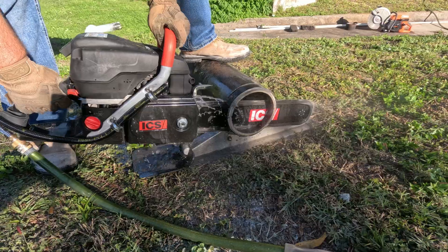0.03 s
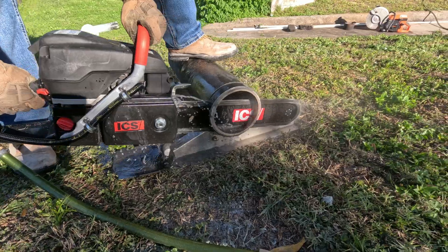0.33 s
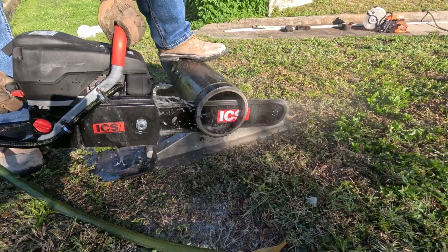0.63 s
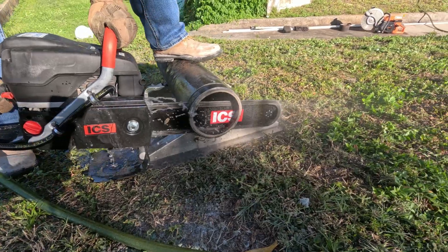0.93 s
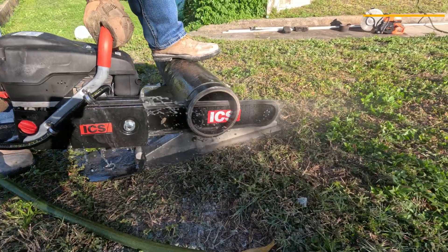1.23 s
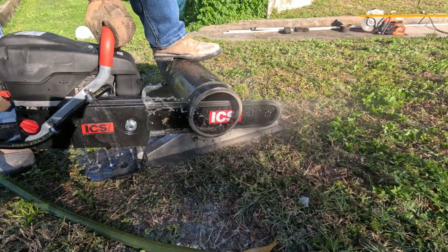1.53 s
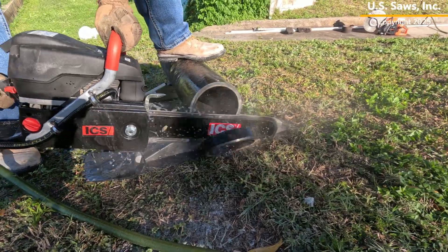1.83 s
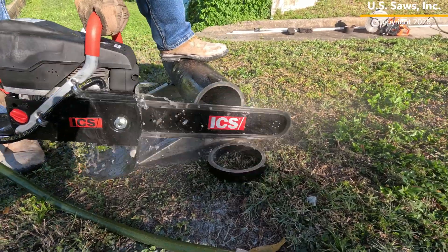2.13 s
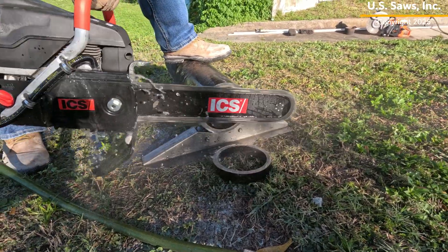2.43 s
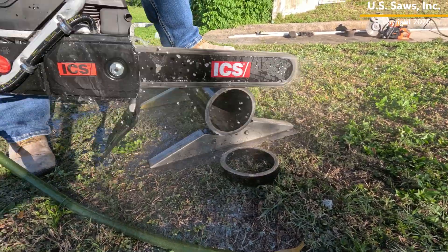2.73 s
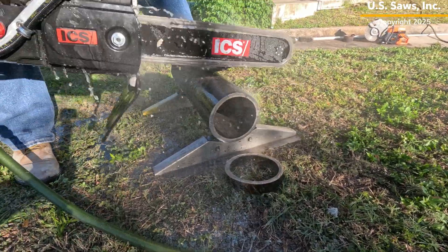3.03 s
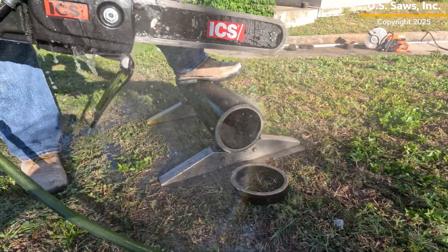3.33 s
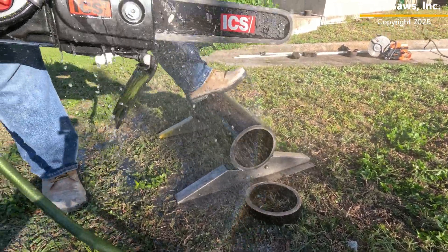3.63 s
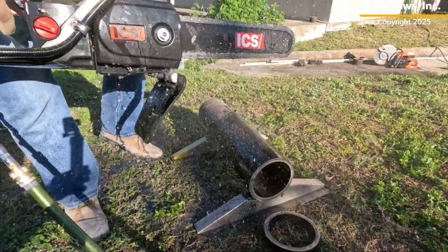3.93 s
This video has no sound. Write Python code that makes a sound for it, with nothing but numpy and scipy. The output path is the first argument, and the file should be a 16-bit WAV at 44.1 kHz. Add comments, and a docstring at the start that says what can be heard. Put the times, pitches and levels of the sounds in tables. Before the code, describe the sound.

A two-stroke chainsaw labours through a metal pipe, close by on a lawn. It gains speed, races and stutters as the cut ends, is revved twice, then coasts towards idle with its chain rattling and whining.

```python
"""A two-stroke chainsaw labours through a metal pipe, close by on a lawn. It gains speed as the cut
opens, races and stutters when the ring drops off, is blipped twice and coasts towards idle.
Each firing is a thump of gas, a crack through the muffler and a jet of hiss; with the throttle shut
the piston pumps soft puffs of air. The wet chain rattles round its ringing bar and whines on its
sprocket, over a low rumble of air."""
import sys
import numpy as np
from scipy import signal
from scipy.io import wavfile
from scipy.ndimage import uniform_filter1d

SR = 44100
rng = np.random.default_rng(int(sys.argv[2]) if len(sys.argv) > 2 else 0)


def master_out(mix):
    """Clip the mix to full scale and print it as 16-bit PCM to the path in sys.argv[1]."""
    frames = np.transpose(np.atleast_2d(mix))
    ceiling = np.clip(frames, -1, 1)
    pcm = np.round(ceiling * 32767).astype(np.int16)
    wavfile.write(sys.argv[1], SR, pcm)


N = 176400
T = np.arange(N) / SR
CRUISE_HZ = 124  # reference engine speed


# Revs of the engine: time_s, speed_hz
ENGINE_SPEED = [(0.0, 92.61), (0.25, 91.95), (0.45, 92.2), (0.58, 95.63), (0.7, 103.27), (0.82, 111.55),
                (0.97, 116.13), (1.2, 121.74), (1.55, 123.49), (1.75, 125.3), (1.85, 128.91),
                (1.97, 152.78), (2.06, 156.16), (2.17, 132.96), (2.3, 107.63), (2.45, 89.09), (2.6, 71.33),
                (2.72, 104.52), (2.81, 90.51), (2.91, 114.36), (2.98, 125.43), (3.065, 140.79),
                (3.18, 119.74), (3.32, 95.28), (3.5, 72.92), (3.65, 59.7), (3.8, 52.8), (4.0, 46.94)]
def crankshaft():
    """The engine's speed and its running count of turns, which drive the saw."""
    speed = curve(ENGINE_SPEED)
    return speed, .17 + np.cumsum(speed) / SR


# The long cut and two blips: start_s, end_s, gas_flow_db, load_fraction
THROTTLE_OPEN = [(0, 2.0, 2, 0.84), (2.601, 2.726, -0.5, 0.11), (2.815, 3.068, 1.5, 0.03)]
def throttle(ramp_s=.016):
    """Gates for throttle shut, gas flow, firing under load and revving free."""
    gates = np.zeros((4, N))
    for start, end, flow_db, load in THROTTLE_OPEN:
        gate = np.clip(np.minimum(T - start, end - T) / ramp_s + .5, 0, 1)
        gates += np.outer([1, amp(flow_db), load, 1 - load], gate)
    opened, flow, loaded, free = gates
    return 1 - opened, flow, loaded, free


# Low body of the exhaust: harmonic, level_db
THUMP_HARMONICS = [(1, 0.5), (2, -8.5), (3, -17.5)]
def exhaust_thump(turns, flow):
    """A smooth swell of gas follows each opening of the exhaust port."""
    return amp(-22.5) * harmonics(turns, THUMP_HARMONICS) * flow


# Bite of the exhaust crack: time_s, level_db
CRACK_LEVEL = [(0, 0), (.55, 0), (.9, 2), (1.3, 1), (1.8, 1.5), (2.0, 2), (2.6, 6), (2.72, 5), (2.82, 6),
               (2.91, 7), (2.945, 1), (2.99, 7), (3.07, 9)]
# Bright muffler tone under load: freq_hz, gain_db
LOADED_EQ = [(200, -25), (380, -16), (490, -18.5), (620, 0), (780, -1), (980, 7.5), (1120, 1.5),
             (1260, -13.5), (1480, -2.5), (1700, -10.5), (2050, -2.5), (2550, -14.5), (3200, -9),
             (4000, -10.5), (5200, -22.5), (12000, -52)]
# Darker muffler tone when revving free: freq_hz, gain_db
FREE_EQ = [(200, -11.5), (380, -7.5), (520, -4.5), (680, 3.5), (850, 0.5), (1050, -4), (1300, -16.5),
           (1650, -14.5), (2050, -12.5), (2600, -20), (4000, -38.5), (12000, -85)]
def exhaust_crack(turns, loaded, free):
    """On open throttle, one firing a turn cracks through the muffler."""
    pulses = beats(turns, spread_db=1.2, jitter_s=.00002) * amp(curve(CRACK_LEVEL))
    return amp(-31.5) * evened(colour(pulses * free, FREE_EQ) - colour(pulses * loaded, LOADED_EQ))


# Tone of the gas hiss: freq_hz, gain_db
JET_EQ = [(150, -11), (500, -10), (1100, 4), (1400, -1.5), (2000, 1.5), (2500, -3.5), (3300, 2), (4100, 3),
          (5200, -4.5), (7600, -3), (8800, -10.5), (11000, -19.5), (15000, -32)]
def gas_jet(turns, flow, decay_turns=.32):
    """Escaping gas and biting teeth give a burst of hiss on each firing."""
    burst = (.16 + np.exp(-(turns % 1) / decay_turns)) * flow
    mid, side = (evened(colour(burst * noise, JET_EQ)) for noise in rng.standard_normal((2, N)))
    return amp(-34) * place(mid, .29 * side, left_db=.54)


# Lone firings off the throttle: start_s, level_db, sharpness_fraction
STRAY_FIRINGS = [(2.0045, 5.5, 0.56), (2.030, 4, 0.76), (2.056, 3.5, 0.74), (2.082, 3, 0.65),
                 (2.338, 0, 0.1), (2.446, -7, 0.3), (2.567, -2.5, 0.1), (3.813, -24, 0.3), (3.9, -9, 0.2),
                 (3.977, -10, 0.1)]
# Tone of a sharp misfire: freq_hz, gain_db
MISFIRE_EQ = [(200, -6), (600, -9), (950, -5), (1250, -9.5), (1580, 3), (1850, -3), (2300, -13),
              (3300, -10), (5000, -20), (12000, -40)]
def pops(push_s=.0012):
    """Each stray firing is a crack, part dull and part sharp, with one push of gas."""
    times, db, sharpness = np.transpose(STRAY_FIRINGS)
    hits = clicks(times, amp(db))
    sharp = clicks(times, amp(db) * sharpness)
    crack = colour(hits - sharp, FREE_EQ) - colour(sharp, MISFIRE_EQ)
    age = T[:SR // 20] / push_s
    push = signal.oaconvolve(hits, age * (2 - age) * np.exp(-age))[:N]
    return amp(8) * crack + amp(-16.5) * push


def muffler_drone(speed, turns, loaded, db_per_octave=-38):
    """The muffler body drones while the engine labours at low speed."""
    labour = loaded * amp(db_per_octave * np.log2(speed / CRUISE_HZ))
    pulses = beats(turns, spread_db=1.2, jitter_s=.00002) * labour
    return amp(-43.5) * evened(formant(pulses, hz=414, width_hz=120))


# Hum of the coasting engine: harmonic, level_db
HUM_HARMONICS = [(1, 1.5), (2, -14.5), (3, -20.5)]
# Fader on the unfired puffs: time_s, level_db
PUFF_FADER = [(2.1, -26), (2.3, -14), (2.5, 0), (2.78, 1), (3.1, -2.5), (3.4, 0.5), (4, 2)]
def coasting(speed, turns, shut):
    """Unfired, the piston pumps air: a hum, low gulps, and puffs whose pitch sinks with the revs."""
    octaves = np.log2(speed / CRUISE_HZ)
    hum = amp(-31 + 15.5 * octaves) * harmonics(turns, HUM_HARMONICS)
    strokes = evened(beats(turns, spread_db=1, jitter_s=.00008))
    air = evened(np.exp(-(turns % 1) / 1.05) * rng.standard_normal(N))
    drive = strokes + .44 * air
    slow_boost = amp(-5 * octaves)
    puffs = evened(slow_boost * formant(drive, hz=298 + 3.37 * speed, width_hz=217))
    gulps = evened(slow_boost ** 2 * formant(drive, hz=155.4, width_hz=66))
    return shut * (hum + amp(-42 + curve(PUFF_FADER)) * puffs + amp(-47) * gulps)


# Tone of the chain rattle: freq_hz, gain_db
RATTLE_EQ = [(150, -19), (330, -12.5), (600, -0.5), (900, -6), (1200, -4), (1350, -7.5), (1550, -2.5),
             (1950, -5.5), (2450, -8.5), (3000, -3), (3550, -8), (4000, -7), (5300, -10.5), (6400, -6),
             (7800, -6), (8500, -14.5), (10500, -22.5), (12500, -33), (15500, -47)]
# Metallic ring of the guide bar: pitch_hz, width_hz, level_db
BAR_MODES = [(1730, 110, -18.5), (1890, 54, -12), (3120, 74, 0), (3190, 33, 6.5), (6220, 97, -15),
             (6900, 90, -10), (7380, 190, -7.5)]
# Chain faders, the bar damped during the cut: time_s, rattle_db, ring_db, sing_db
CHAIN_FADERS = [(0, 4, -9, -17), (1.0, 3.5, -13, -12), (1.8, 3.5, -5, -8), (2.08, -0.5, -7, -17),
                (2.17, 1.5, -2.5, -8), (2.57, -0.5, -2.5, -4), (2.9, 2.5, -3, -5), (3.15, 2.5, -5, -2),
                (3.55, 0, -7, 3.5), (3.85, -0.5, -4, 1), (4, -2.5, -5, -9)]
def chain(speed, turns, links_per_turn=24):
    """Links slap at scattered points of each turn and ring the bar, in a hiss of flung water."""
    slaps = sum(beats(turns + offset, spread_db=2, jitter_s=.00006) * np.sign(polarity - .5)
                for offset, polarity in rng.random((links_per_turn, 2)))
    flutter = amp(.98 * waver(samples=600))
    spray = .97 * rng.standard_normal(N)
    drive = (evened(slaps) + spray) * flutter
    rattle = evened(colour(drive, RATTLE_EQ))
    ring = evened(sum(amp(db) * resonate(drive, hz, width) for hz, width, db in BAR_MODES))
    sing = evened(formant(drive, hz=2754 + 1.8 * speed, width_hz=180))  # one bar mode follows the revs
    return (amp(-34.5 + curve(CHAIN_FADERS, column=1)) * rattle
            + amp(-39.5 + curve(CHAIN_FADERS, column=2)) * ring
            + amp(-44 + curve(CHAIN_FADERS, column=3)) * sing)


# Partials of the sprocket: engine_harmonic, level_db
WHINE_PARTIALS = [(6, -1.5), (8, 6), (12, -12), (13, -7)]
def sprocket_whine(speed, turns, shut, waver_db=4):
    """Off the throttle, the slack chain whines on its sprocket, sinking and fading with the revs."""
    tone = np.zeros(N)
    for harmonic, db in WHINE_PARTIALS:
        level = amp(db + waver_db * waver(samples=1500))
        tone += level * np.cos(2 * np.pi * (harmonic * turns + rng.random()))
    return amp(-47.5) * evened(tone) * shut * speed / CRUISE_HZ


def yard_echo(x, t60_s=.12):
    """The surroundings scatter back a faint, short tail of mids and treble."""
    t = T[:SR // 4]
    tail = rng.standard_normal((2, len(t))) * amp(-60 * t / t60_s) * (t > .004)
    tail = signal.sosfilt(signal.butter(2, 400, "high", fs=SR, output="sos"), tail)
    return amp(-19) * signal.oaconvolve(x, tail / np.linalg.norm(tail[0]), axes=1)[:, :N]


# Tone of the low air bed: freq_hz, gain_db
AIR_EQ = [(15, -8), (40, -4), (120, -0.5), (250, -12), (600, -13.5), (2000, -55)]
def air_rumble():
    """Air stirs softly round the microphone."""
    mid, side = (evened(colour(noise, AIR_EQ)) for noise in rng.standard_normal((2, N)))
    return amp(-41.5) * place(mid, .37 * side, left_db=0)


def amp(db):
    """Decibels to gain."""
    return 10 ** (np.asarray(db) / 20)


def evened(x):
    """Scales to an rms of 1."""
    return x / np.sqrt(np.mean(x ** 2) + 1e-20)


def curve(table, column=1):
    """One column of a time table at every sample."""
    rows = np.array(table)
    return np.interp(T, rows[:, 0], rows[:, column])


def waver(samples):
    """Smoothed random drift with an rms of 1."""
    return evened(uniform_filter1d(rng.standard_normal(N), size=samples))


def colour(x, eq):
    """Minimum-phase filter that follows an EQ curve."""
    bins_hz = abs(np.fft.fftfreq(4096, 1 / SR))
    hz, db = np.transpose(eq)
    log_gain = np.log(amp(np.interp(np.log(bins_hz + 1), np.log(hz + 1), db)))
    taps = np.fft.ifft(np.exp(np.conj(signal.hilbert(log_gain)))).real[:2048]
    return signal.oaconvolve(x, taps)[:N]


def resonate(x, hz, width_hz):
    """A steady or moving resonance of gain 1."""
    carrier = np.exp(2j * np.pi * np.cumsum(hz * np.ones(N)) / SR)
    pole = np.exp(-np.pi * width_hz / SR)
    return 2 * (carrier * signal.lfilter([1 - pole], [1, -pole], x / carrier + 1e-18)).real


def formant(x, hz, width_hz):
    """Two equal resonances in series, for steeper skirts."""
    return resonate(resonate(x, hz, width_hz), hz, width_hz)


def harmonics(turns, partials, lag_turns=.21):
    """A tone locked to the crankshaft, one row per successive harmonic."""
    phase = 2 * np.pi * (turns - lag_turns)
    return evened(sum(amp(db) * np.cos(k * phase) for k, (_, db) in enumerate(partials, 1)))


def clicks(times, sizes):
    """Band-limited impulses at exact times."""
    at = (times * SR).astype(int)[:, None] + np.arange(-7, 9)
    gap = at - times[:, None] * SR
    shape = np.sinc(gap) * np.sinc(gap / 8)
    return np.bincount(np.clip(at, 0, N).ravel(), (shape * sizes[:, None]).ravel(), N + 1)[:N]


def beats(turns, spread_db, jitter_s):
    """One click a turn, uneven in strength and timing."""
    times = np.interp(np.arange(1, turns[-1]), turns, T)
    size, late = rng.standard_normal((8000, 2))[:len(times)].T
    return clicks(times + jitter_s * late, amp(spread_db * size))


def place(mid, side, left_db):
    """Mid and side to stereo, leaning left."""
    return np.array([(mid + side) * amp(left_db), (mid - side) * amp(-left_db)])


def scene():
    """One crankshaft drives every part of the saw; echo and air sit behind it."""
    speed, turns = crankshaft()
    shut, flow, loaded, free = throttle()
    firing = exhaust_thump(turns, flow) + exhaust_crack(turns, loaded, free) + gas_jet(turns, flow)
    engine = firing + pops() + muffler_drone(speed, turns, loaded) + coasting(speed, turns, shut)
    chain_mid, chain_side = chain(speed, turns), chain(speed, turns)
    saw = engine + place(chain_mid, .23 * chain_side, left_db=1.4) + sprocket_whine(speed, turns, shut)
    return saw + yard_echo(saw) + air_rumble()


def record(dry, threshold_db=-30, slope=.58, release_db_per_s=92):
    """A compressor holds the firing engine down; a low-pass trims the top treble."""
    power_db = 10 * np.log10(abs(uniform_filter1d((dry ** 2).mean(0), size=900)) + 1e-12)
    release = T * release_db_per_s
    peak_db = np.maximum.accumulate(power_db + release) - release
    over_db = np.maximum(peak_db - threshold_db, 0)
    held = dry * amp(-slope * uniform_filter1d(over_db, size=300))
    held *= T > .036  # the sound cuts in after an instant of silence
    low_pass = signal.firwin(511, 15200, window=("kaiser", 9), fs=SR)
    return signal.oaconvolve(held, low_pass[None], "same")


dry = scene()
out = record(dry)
master_out(out)
```